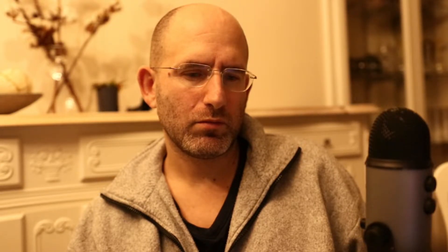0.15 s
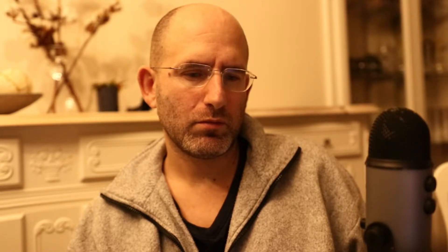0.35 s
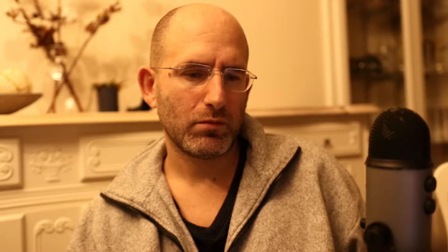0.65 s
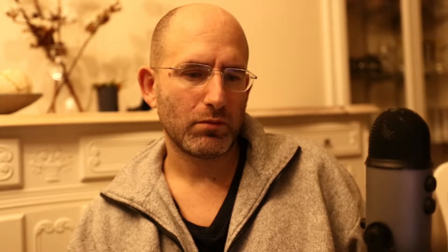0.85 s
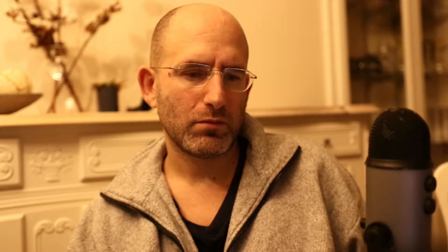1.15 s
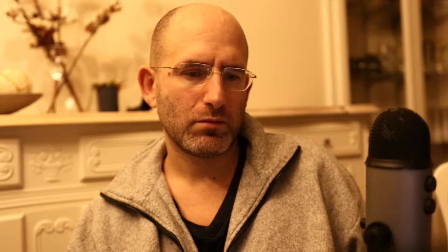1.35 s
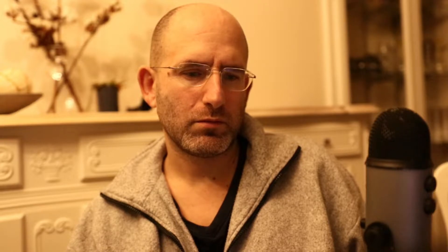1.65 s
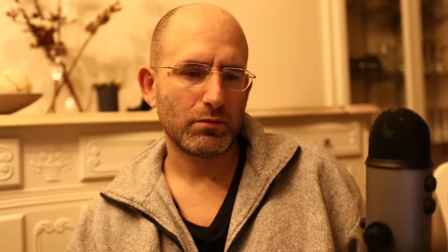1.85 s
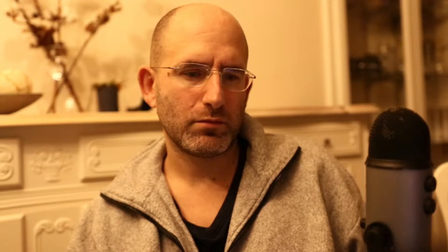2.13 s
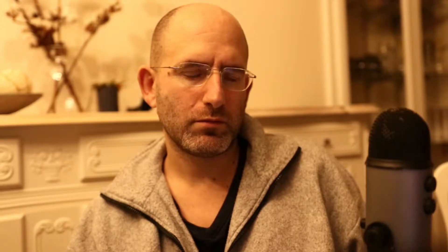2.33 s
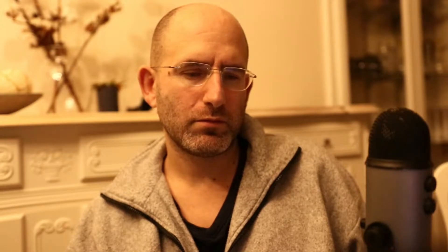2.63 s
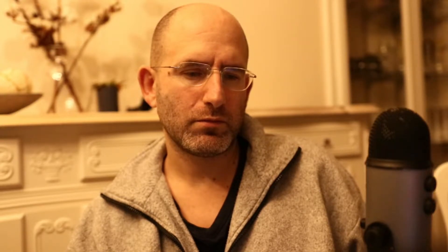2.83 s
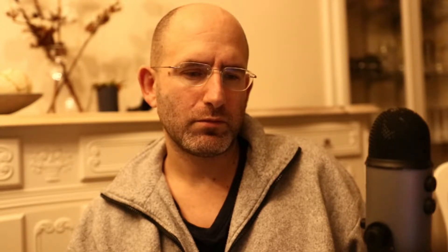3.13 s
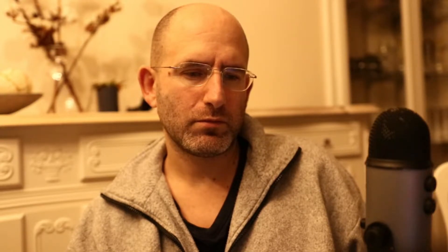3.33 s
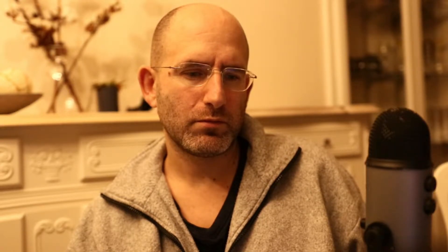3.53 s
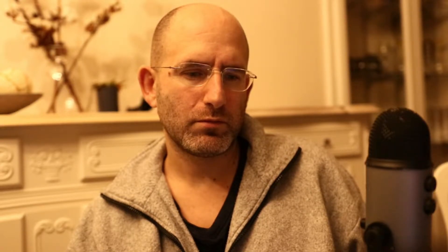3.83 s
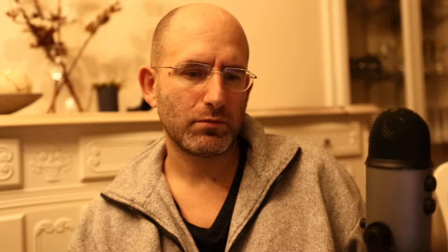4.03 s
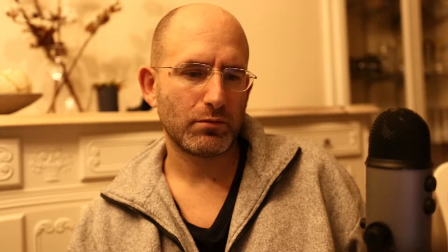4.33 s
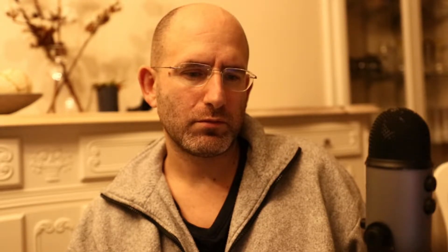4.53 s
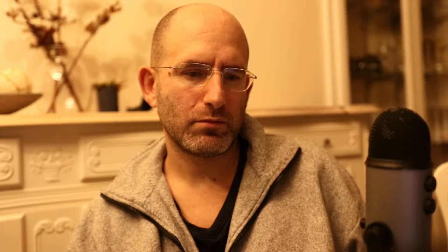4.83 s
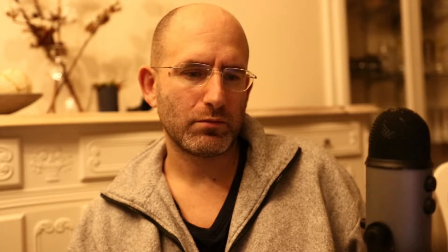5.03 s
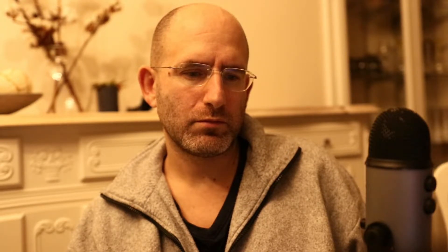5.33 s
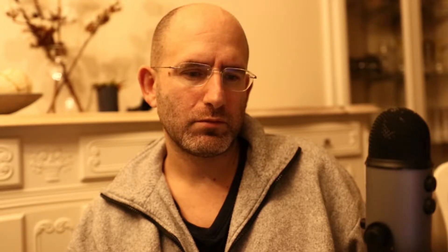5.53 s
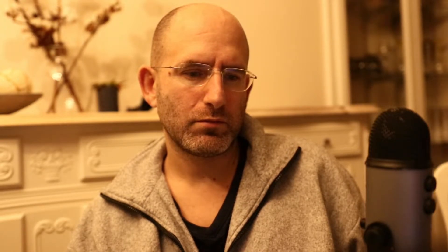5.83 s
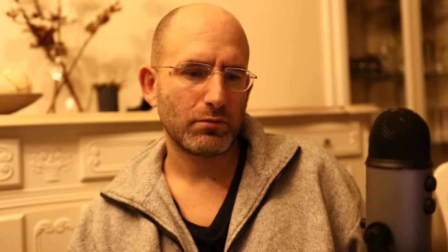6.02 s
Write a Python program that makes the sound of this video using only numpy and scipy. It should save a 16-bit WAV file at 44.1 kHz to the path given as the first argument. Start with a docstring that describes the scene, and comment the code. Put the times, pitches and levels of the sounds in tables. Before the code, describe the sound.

A quiet living room is heard for about six seconds, at a very low level throughout. From the start, a small fan hums to the left of the microphone, low and steady with only a slight waver, over a soft, even rush of air. At about 0.3 seconds, one small dull tick sounds close to the microphone and dies away at once. From about 2.5 seconds a faint second tone, a little higher than the main hum, swells in, reaches its level near 3.8 seconds and holds with a slight pulsing. High above, barely audible thin whines stay constant, and a very faint electrical sizzle buzzes along, flaring slightly a few times, around 0.3, 2.5 to 3.7 and 4.9 seconds. A soft microphone hiss fills the top. The hum and air carry on to the end.

```python
"""Small fan in a quiet living room

A fan hums to the left, in harmonics of its shaft rate, over a soft, even rush of air.
A faint second tone swells in near halfway, and thin whines sit above it.
Something electrical sizzles once per mains cycle. One small dull tick rings near the
microphone, whose own hiss fills the top."""
import sys
import numpy as np
from scipy import signal
from scipy.fft import rfft, irfft
from scipy.io import wavfile
from scipy.ndimage import uniform_filter1d

SR = 44100
rng = np.random.default_rng(int(sys.argv[2]) if len(sys.argv) > 2 else 0)


def to_wav(sig):
    """Store sig (one row per channel, or 1-D mono) as 16-bit WAV at the path in sys.argv[1].

    Samples outside -1..1 are clipped; the rate is SR.
    """
    pcm = np.clip(np.atleast_2d(sig), -1, 1) * 32767
    pcm = np.round(pcm).astype(np.int16)
    wavfile.write(sys.argv[1], SR, pcm.T)  # frames by channels


N = 272273

# microphone hiss: f/Hz, density/(dB per Hz)
HISS_SPECTRUM = [(100, -114), (8800, -115.5), (9500, -112.7), (11000, -113), (16000, -114)]
# rush of air: f/Hz, density/(dB per Hz)
AIR_SPECTRUM = [(10, -80.5), (30, -86), (48, -84), (95, -81.5), (130, -86.5), (175, -81), (290, -87),
                (420, -92.5), (1000, -97.5), (1750, -94.5), (2050, -97), (3600, -104.3), (5200, -107.7),
                (7500, -115), (8800, -118), (9800, -138)]
# housing and room resonances: f/Hz, width/Hz, left/(dB per Hz), right/(dB per Hz)
AIR_RESONANCES = [(79, 13, -77.5, -78), (240, 17, -67.5, -76), (272, 50, -85, -94), (355, 32, -85.5, -99),
                  (432.6, 26, -105, -88), (840, 84, -95, -93.5), (934, 190, -93, -94.5),
                  (1320, 440, -94.5, -106), (2446, 350, -93.5, -105), (2746, 290, -101, -96),
                  (3260, 180, -96.5, -106), (4050, 290, -101.5, -104)]
# air, left against right: f/Hz, correlation
AIR_CORRELATION = [(40, 0.24), (85, -0.28), (150, 0.42), (240, 0.16), (330, 0.15), (500, 0.26), (800, 0.65),
                   (1200, 0.052), (5000, 0.13)]
# thin whines: f/Hz, level/dB
WHINE_TONES = [(1061, -85), (1208, -87), (1460, -86), (1986, -87), (2293, -88), (6000, -91.5),
               (6451, -93.5), (6735, -97), (10000, -102)]
# sizzle before its envelope: f/Hz, density/(dB per Hz)
SIZZLE_SPECTRUM = [(4500, -130), (6200, -116), (6800, -110.5), (7150, -113), (7420, -107.5), (8100, -120),
                   (8800, -120), (10000, -140)]
# sizzle flares: t/s, level/dB over a usual spit
SIZZLE_FLARES = [(0.311, 6), (2.410, 6), (2.711, 8), (3.25, 5), (3.671, 5), (4.909, 6.5)]
# tick resonances: f/Hz, level/dB, t60/s
TICK_MODES = [(397, -51, 0.023), (595, -37.5, 0.017), (900, -43.5, .008), (1530, -44.5, 0.0064),
              (3150, -44, 0.0076)]
# fan hum: multiple of shaft rate, left/dB, right/dB, left lead/rad
FAN_HARMONICS = [(1, -58, -65, 1.6), (2, -71, -69, 2.5), (3, -69, -70.5, -1), (4, -43, -53, 0.73),
                 (5, -52.5, -56.5, -2.5), (6, -63, -79, 4), (12, -75.5, -84, 3.5), (13, -75.5, -78, -0.9),
                 (16, -72, -74, 0)]

BINS_HZ = np.fft.rfftfreq(N, 1 / SR)


def gain_of(db):
    """Decibels to amplitude."""
    return 10 ** (np.asarray(db) / 20)


def curve(points):
    """Table interpolated onto the FFT bins, log frequency."""
    hz, value = np.transpose(points)
    return np.interp(np.log(BINS_HZ + 1), np.log(hz + 1), value)


def noise(density):
    """Noise of given amplitude per root hertz."""
    return irfft(rfft(rng.standard_normal(N)) * density, N) * np.sqrt(SR / 2)


def drift(rate_hz):
    """Slow random wander, unit variance."""
    x = noise(np.exp(-(BINS_HZ / rate_hz) ** 2))
    return (x - x.mean()) / x.std()


def air(ripple_db=1.5, ripple_hz=16):
    """Broad turbulence with resonances, finely rippled by room reflections."""
    power = np.tile(gain_of(curve(AIR_SPECTRUM)) ** 2, (2, 1))
    for hz, width_hz, left_db, right_db in AIR_RESONANCES:
        power += gain_of([[left_db], [right_db]]) ** 2 / (1 + 2 * ((BINS_HZ - hz) / width_hz) ** 2) ** 2
    correlation = curve(AIR_CORRELATION)
    left, independent = rfft(rng.standard_normal((2, N)))
    right = correlation * left + np.sqrt(1 - correlation ** 2) * independent
    ripple = uniform_filter1d(rng.standard_normal(power.shape), round(ripple_hz * N / SR))
    ripple += ripple.mean(axis=0)  # largely shared by both sides
    ripple *= np.minimum(BINS_HZ / 900, 1) / ripple.std()  # room modes crowd above the bass
    colour = np.sqrt(power * SR / 2) * gain_of(ripple_db * ripple)
    return irfft(np.array([left, right]) * colour, N)


def whines(t):
    """Faint steady sines, same on both sides."""
    return np.sqrt(2) * sum(gain_of(db) * np.sin(2 * np.pi * (hz * t + rng.random()))
                            for hz, db in WHINE_TONES)


def sizzle(t, mains_hz=50, first_s=0.0098, fade_s=0.0039, flare_s=0.02,
           level_db=-0.5, uneven_db=2, lean_db=1.2):
    """Electrical treble spit on each mains cycle, uneven in strength, with brief flares."""
    cycle, fraction = np.divmod((t - first_s) * mains_hz + 1, 1)
    age_s = fraction / mains_hz
    spit = np.sqrt(age_s / fade_s) * np.exp(-age_s / fade_s)
    strength = gain_of(uneven_db * rng.standard_normal(int(cycle[-1]) + 1))[cycle.astype(int)]
    for at_s, db in SIZZLE_FLARES:
        flare = gain_of(db) * np.exp(-((t - at_s - flare_s / 2) / (2 * flare_s)) ** 2)
        strength = np.maximum(strength, flare)
    envelope = gain_of(level_db) * strength * spit / np.sqrt(np.mean(spit ** 2))
    colour = gain_of(curve(SIZZLE_SPECTRUM))
    return envelope * np.array([gain_of(lean_db) * noise(colour), gain_of(-lean_db) * noise(colour)])


def tick(t, at_s=0.331, snap_db=-59, snap_s=0.0012, echo_db=-13, echo_s=0.0077):
    """Soft snap into heavily damped modes, with one near reflection."""
    age_s = np.maximum(t - at_s, 0)
    ring = -sum(gain_of(db - 60 * age_s / t60_s) * np.sin(2 * np.pi * hz * age_s)
                for hz, db, t60_s in TICK_MODES)
    snap = gain_of(snap_db) * np.sqrt(age_s / snap_s) * np.exp(-age_s / snap_s) * rng.standard_normal(N)
    direct = uniform_filter1d(ring, size=5) + snap
    return direct + gain_of(echo_db) * np.interp(t - echo_s, t, direct)


def second_tone(t, hz=333.3, start_s=2.55, swell_s=1.25, level_db=-64.3, lean_db=-0.5, lead_rad=1.0):
    """Sine that swells in, holds and beats against the fan's sixth harmonic."""
    swell = np.sin(np.pi / 2 * np.clip((t - start_s) / swell_s, 0, 1)) ** 2
    held = np.sqrt(2) * gain_of([[level_db + lean_db], [level_db - lean_db]])
    phase = 2 * np.pi * hz * t
    return swell * held * np.sin([phase, phase - lead_rad])


def fan(shaft_hz=56.76, wander=0.00096, waver_db=0.37):
    """Harmonics of a slightly wandering shaft; standing waves set each side's level and phase."""
    turns = np.cumsum(shaft_hz * (1 + wander * drift(rate_hz=2.2))) / SR
    hum = np.zeros((2, N))
    for multiple, left_db, right_db, lead_rad in FAN_HARMONICS:
        phase = 2 * np.pi * (multiple * turns + rng.random())
        hum += [gain_of(left_db) * np.sin(phase), gain_of(right_db) * np.sin(phase - lead_rad)]
    return np.sqrt(2) * hum * gain_of(waver_db * drift(rate_hz=4.2))


def scene():
    """All room sources, left and right."""
    t = np.arange(N) / SR
    return air() + whines(t) + sizzle(t) + tick(t) + second_tone(t) + fan()


def record(dry, cutoff_hz=15850):
    """Microphone hiss, same on both sides, then the band limit."""
    hiss = noise(gain_of(curve(HISS_SPECTRUM)))
    lowpass = signal.firwin(801, cutoff_hz, window=("kaiser", 9), fs=SR)
    return signal.oaconvolve(dry + hiss, lowpass[None], "same")


dry = scene()
out = record(dry)
to_wav(out)
```